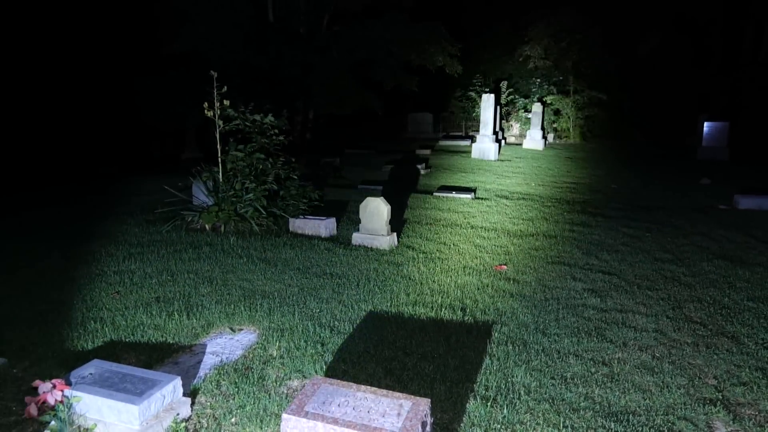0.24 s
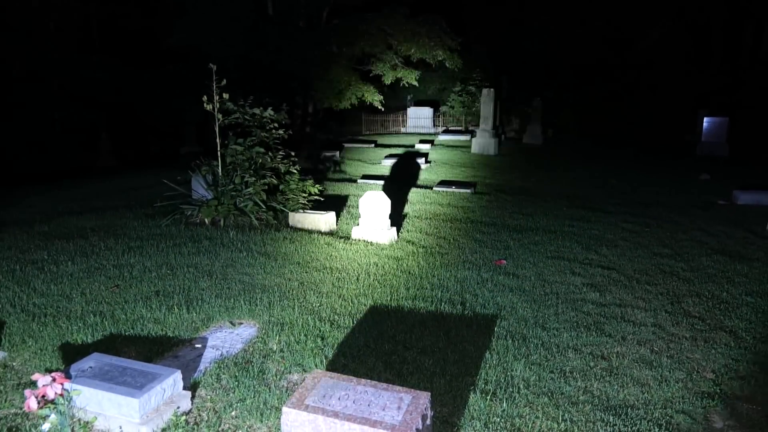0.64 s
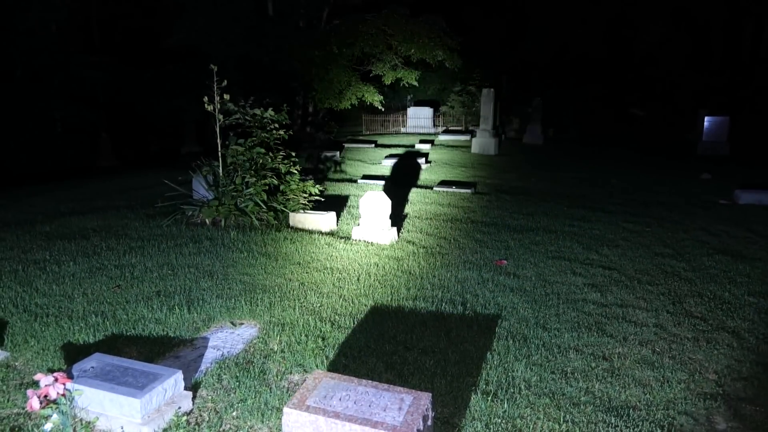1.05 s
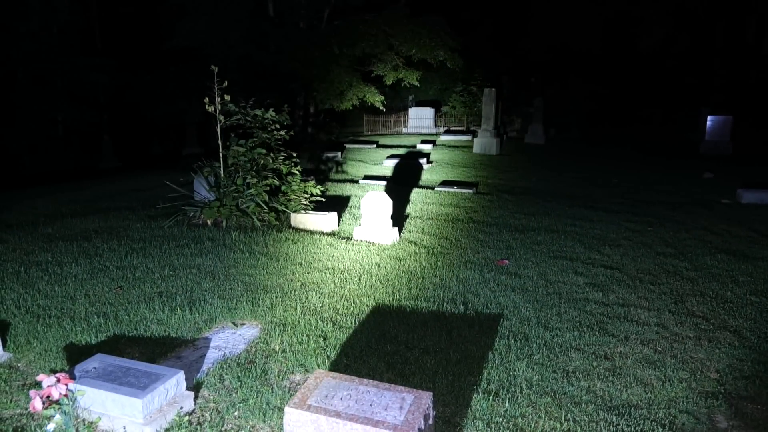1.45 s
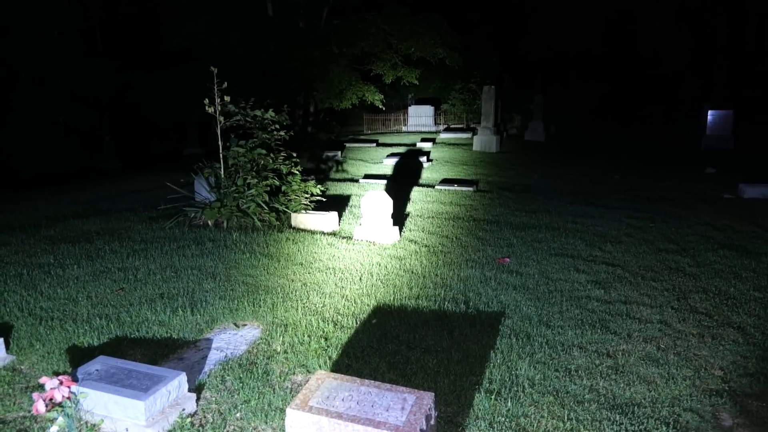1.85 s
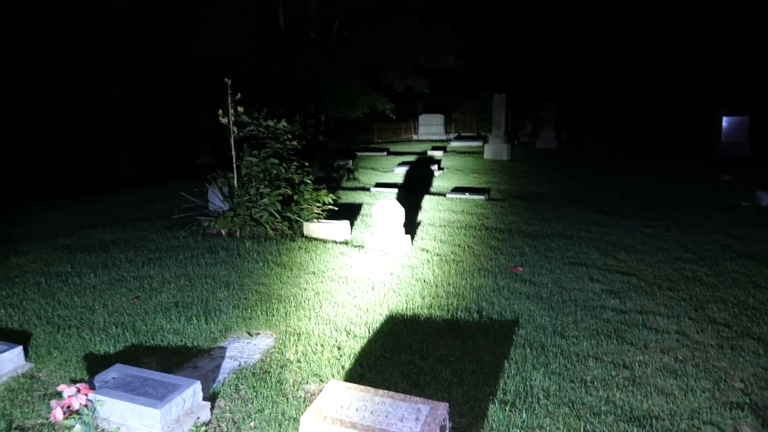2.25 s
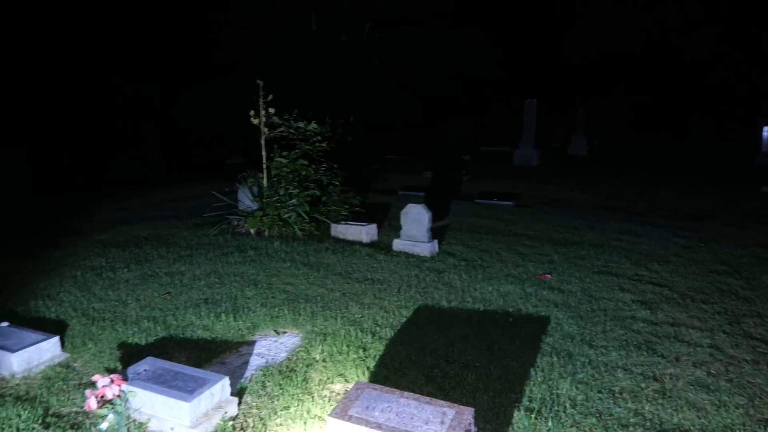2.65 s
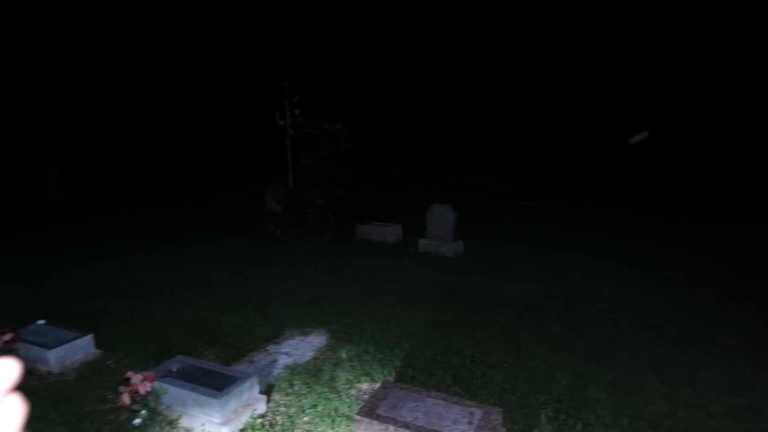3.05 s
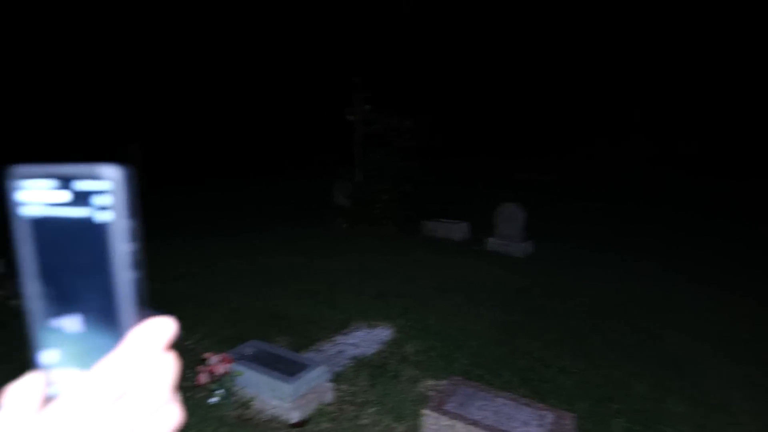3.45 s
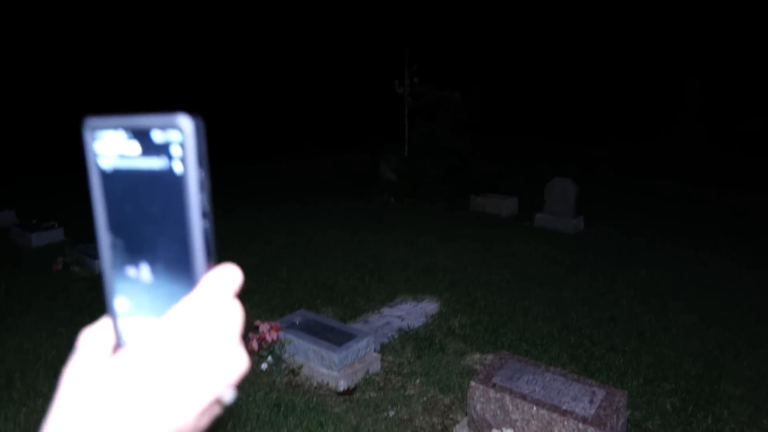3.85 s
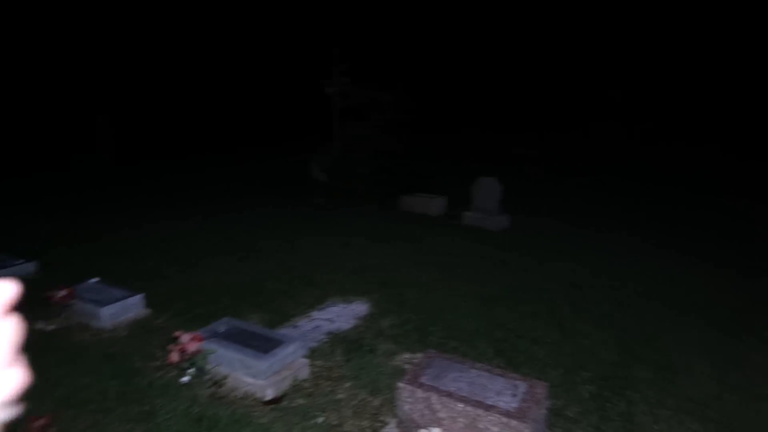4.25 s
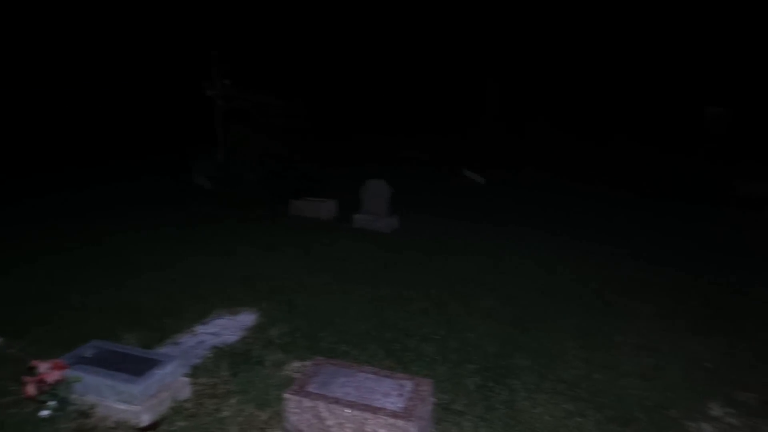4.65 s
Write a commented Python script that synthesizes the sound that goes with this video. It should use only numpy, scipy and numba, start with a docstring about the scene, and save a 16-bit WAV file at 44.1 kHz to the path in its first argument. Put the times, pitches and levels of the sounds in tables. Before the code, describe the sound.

A continuous shimmering cricket chorus fills a wide stereo field, with low warm trills loudest and thinner high ones throbbing above. Grainy katydid rasps come and go far off. A sharp, high pulsed buzz from a nearer katydid rings into the trees, faint hoots follow, then a tiny dry tick and a second buzz cut off at the end. Distant road drone lies underneath.

```python
"""Crowds of crickets trill near and far at night on an open lawn ringed by trees, each crowd on its own note.
Every singer is a row of decaying wing strokes; far katydids are grainy noise that rasps in waves.
A near katydid buzzes twice in bursts of wing-filtered noise, and the trees answer with a noise tail.
Filtered noise makes the distant traffic, the soft hiss of the air and a few faint hoots; a dry tick sounds once."""
import sys
import numpy as np
from scipy import signal
from scipy.fft import rfft, irfft
from scipy.io import wavfile
from scipy.ndimage import uniform_filter1d
from numba import njit

SR = 44100
rng = np.random.default_rng(int(sys.argv[2]) if len(sys.argv) > 2 else 0)


def voltage_ratio(level):
    """Linear amplitude factor for a level in decibels (scalar or array-like)."""
    return 10 ** (np.asarray(level, float) / 20)


def wrap_up_sound(samples):
    """Save the sound to the file named by the first command line argument, as 16-bit audio."""
    columns = np.atleast_2d(samples).T
    # keep every value between -1 and 1, then stretch to whole-number steps
    tamed = np.clip(columns, -1, 1)
    steps = np.round(tamed * 32767).astype(np.int16)
    wavfile.write(sys.argv[1], SR, steps)


N = 211981
T = np.arange(N) / SR  # s
HZ = np.maximum(np.arange(N // 2 + 1) * SR / N, 1)  # spectrum bins

# stereo width of the open air, opposed part against shared part: hz, side_db
AIR_SIDE = [(30, -9), (100, -23), (250, -16), (500, -15.5), (1200, -7), (6000, -1), (8500, -14),
            (11000, -0.5), (15000, 0.5)]


def level(x, db):
    """Scales to an rms level."""
    return x * voltage_ratio(db) / np.sqrt(np.mean(x ** 2))


def colour(x, table):
    """Filters by (Hz, dB) points, all but silent outside them."""
    hz, db = np.transpose(table)
    gain_db = np.interp(np.log(HZ), np.log(hz), db, -90, -90)
    return irfft(rfft(x) * voltage_ratio(gain_db), N)


def pair(side_db):
    """Stereo noise from a shared and an opposed part."""
    mid, side = rng.standard_normal((2, N))
    side = colour(side, side_db)
    return np.array([mid + side, mid - side])


def walk(rate):
    """Random levels held 1 / rate s, then smoothed twice over that time."""
    hold = int(SR / rate)
    steps = np.repeat(rng.standard_normal(N // hold + 1), hold)
    return 0.62 * uniform_filter1d(uniform_filter1d(steps, hold), hold)[:N]


def curves(table):
    """Gain over time for each dB column of a table."""
    s, *columns = np.transpose(table)
    return [voltage_ratio(np.interp(T, s, db)) for db in columns]


@njit
def strokes(start, hz, ring, left, right, n, sr):
    """Each stroke swells and dies as t exp(-t / ring) on its note; start and ring are in samples."""
    out = np.zeros((2, n))
    for j in range(len(start)):
        turn = np.exp(2j * np.pi * hz[j] / sr - 1 / ring[j])
        z = 1 + 0j
        for i in range(int(8 * ring[j])):
            z *= turn
            k = start[j] + i
            if 0 <= k < n:
                out[0, k] += (i / ring[j] * z * left[j]).imag
                out[1, k] += (i / ring[j] * z * right[j]).imag
    return out


def trill(hz, rate, ring_ms, lead, pan_db, uneven_db=0.5, wobble=0.0044, sway_db=3.0):
    """Singers in rows: every one keeps its own note, pace and place; strokes vary a little."""
    # per stroke: timing, level, phase, note
    chance = rng.standard_normal((len(hz), int(6 * rate.max()), 4))
    gaps = (1 + .06 * chance[..., 0]) / rate[:, None]
    s = np.cumsum(gaps, axis=1) - .3 - rng.random((len(hz), 1)) / rate[:, None]
    # each singer swells and sinks at its own slow pace
    pace, start = rng.random((len(hz), 2, 1)).transpose(1, 0, 2)
    sway = sway_db * np.sin(2 * np.pi * ((0.605 + 2.562 * pace) * s + start))
    size = voltage_ratio(sway + uneven_db * chance[..., 1]) * np.exp(2j * np.pi * chance[..., 2])
    # left and right differ in level and phase
    side = (voltage_ratio(pan_db / 2) * np.exp(.5j * lead))[:, None]
    left, right = (size * side).ravel(), (size / side).ravel()
    note = hz[:, None] * (1 + wobble * chance[..., 3])
    ring = np.full(s.size, ring_ms * SR / 1000)
    return strokes((s * SR).astype(np.int64).ravel(), note.ravel(), ring, left, right, N, 1. * SR)


def rasp_gain():
    """Swells of the far rasps add in power over a steady bed."""
    # far rasps, the loud caller in pairs and softer ones between: peak_s, level_db, length_ms
    rasps = [(.04, -38, 170), (.25, -37.5, 160), (.85, -44.5, 460), (1.53, -37.5, 160), (1.74, -39.5, 210),
             (2.05, -46, 470), (2.4, -44.5, 350), (2.89, -40.5, 200), (3.03, -41.5, 140), (3.36, -51, 200),
             (3.87, -39, 200), (4.08, -39, 160), (4.3, -48, 290), (4.68, -47, 560)]
    bed_db = -46.5
    power = voltage_ratio(2 * bed_db)
    for s, db, ms in rasps:
        power = power + voltage_ratio(2 * db) * np.exp(-((T - s) / (ms / 2500)) ** 2)
    return np.sqrt(power)


def crowd_gains():
    """Slow level of each group of trills; the high group throbs at a steady pace."""
    # low and middle groups, below 3.3 kHz: time_s, low_db, middle_db
    low_trills = [(0, -27, -32), (.45, -28, -33.5), (.75, -29.5, -32.5), (1.9, -28.5, -33),
                  (2.6, -28, -33.5), (3.15, -28.5, -33), (3.7, -28.5, -32.5), (4.81, -28.5, -32)]
    # three upper groups that swell apart, one table each: time_s, level_db
    upper_trills = [
        [(0, -42.5), (.5, -46), (.7, -41.5), (.88, -42), (1.17, -47.5), (1.4, -45), (1.85, -47), (2.05, -44),
         (2.45, -43.5), (2.8, -45.5), (3.02, -42.5), (3.2, -49), (3.45, -47), (3.75, -44), (3.9, -54),
         (4.05, -40), (4.25, -46.5), (4.81, -45)],
        [(0, -47), (.7, -46), (1.1, -47), (1.4, -40), (1.6, -42), (1.75, -47), (1.9, -42), (2.2, -52),
         (2.45, -44), (2.75, -47), (3.0, -43), (3.3, -46), (3.55, -46), (3.76, -37.5), (4.1, -44), (4.25, -49),
         (4.81, -48)],
        [(0, -43), (.2, -47), (.8, -43.5), (1.0, -48), (1.3, -43), (1.62, -43), (1.75, -45), (1.92, -39),
         (2.15, -49), (2.35, -45), (2.65, -50), (2.95, -43), (3.12, -48), (3.45, -40), (3.65, -46), (3.85, -43),
         (4.25, -48), (4.81, -46)],
    ]
    # high group: time_s, mean_db, throb_swing_db
    high_trill = [(0, -40.5, -0.5), (1.2, -40, .5), (1.7, -39.5, 1), (2.6, -40, 1), (3.2, -39.5, 2.5),
                  (4.0, -40.5, 1), (4.4, -39.5, 2.6), (4.81, -39.5, 2)]
    # top group: time_s, level_db
    top_trill = [(0, -66), (1.2, -64), (1.8, -54), (2.45, -51), (2.95, -49), (3.2, -57), (4.55, -62),
                 (4.75, -47), (4.81, -50)]
    throb_period_s, throb_peak_s = 0.366, 2.946
    s, mean_db, swing_db = np.transpose(high_trill)
    beat = np.cos(2 * np.pi * (T - throb_peak_s) / throb_period_s)
    throb = voltage_ratio(np.interp(T, s, mean_db) + np.interp(T, s, swing_db) * beat)
    upper = sum(map(curves, upper_trills), [])
    soft_band = voltage_ratio(-14) * rasp_gain()  # a soft band near 5.15 kHz shares the far rasps' level curve
    return curves(low_trills) + upper + [throb, soft_band] + curves(top_trill)


def crickets(count=14):
    """Wing strokes of crowds spread around each wing note, and three singers that stand out alone."""
    # crowds: group (0 low, 1 middle, 2-4 upper, 5 high, 6 soft band near 5.15 kHz, 7 top), note_hz, spread_hz,
    # strokes_per_s, ring_ms, level_db (on top of the group's), phase_scatter_rad, left_minus_right_db
    crowds = [(0, 2205, 55, 52, 3.4, -1.5, 1.2, 0), (0, 2230, 140, 52, 2.0, -7, 1.2, 0),
              (0, 1830, 90, 52, 2.0, -24, 1.4, 0), (1, 2610, 70, 66, 2.6, -6, 1.05, -.6),
              (1, 2790, 70, 66, 2.6, -5, 1.05, -.6), (1, 2960, 75, 70, 2.6, -2, 1.05, -.6),
              (1, 3170, 50, 70, 2.6, -15, 1.05, -.6), (2, 4330, 75, 46, 2.2, 0, .7, -2.3),
              (3, 4540, 65, 46, 2.6, -2, .7, -2.3), (4, 4810, 70, 60, 2.6, -.5, .7, -2.3),
              (6, 5150, 90, 60, 1.8, -3, .7, -2.3), (5, 5430, 80, 60, 1.8, -9, .7, -2.3),
              (5, 5850, 110, 64, 1.6, -1, .7, -2.3), (5, 6060, 40, 64, 2.4, -7, .7, -2.3),
              (5, 6340, 45, 64, 2.6, -14.5, .7, -2.3), (7, 6750, 220, 64, 1.2, 0, .7, -1)]
    # wing note of each lone singer: note_hz
    solo_hz = 7020, 2862, 3393
    # lone singers: strokes_per_s, ring_ms, level_db, left_minus_right_db
    solos = [(21.8, 6.8, -57, -2), (14, 42, -45, 25), (13.96, 28, -54, -18)]
    gains = crowd_gains()
    rank = np.arctanh(np.linspace(-.9, .9, count))  # dense in the middle, sparse at the edges
    out = 0
    for group, hz, spread, rate, ring_ms, db, scatter, pan_db in crowds:
        rates = rate * (1 + .07 * rng.standard_normal(count))
        lead = scatter * rng.permutation(rank)
        pan = 2.0 * rng.permutation(rank) + pan_db
        crowd = trill(hz + spread * rank, rates, ring_ms, lead, pan)
        out = out + level(crowd, db) * gains[round(group)]
    for hz, (rate, ring_ms, db, pan_db) in zip(solo_hz, solos):
        note, pace = np.array([[hz], [rate]], float)
        solo = trill(note, pace, ring_ms, np.zeros(1), np.full(1, pan_db), wobble=0.00063)
        out = out + level(solo, db)
    return out


def far_katydids():
    """Many scraping wings blur into a grainy noise rasp that comes in waves."""
    # rasp spectrum: hz, level_db
    rasp_tone = [(3000, 4), (3500, -2), (4500, 2.5), (5500, 2), (6800, -13.5), (7600, -17), (9000, -20.5),
                 (12000, -13), (15000, -21)]
    grain = voltage_ratio(1.9 * walk(150))
    scrape = grain * pair([(2000, -0.5), (7000, -10.0), (16000, -4)])
    return level(colour(scrape, rasp_tone), 0) * rasp_gain()


def traffic():
    """Far tyres and engines: noise split into rumble, drone and tyre hiss, with blurred engine notes."""
    # road noise spectrum before the split: hz, relative_db
    road_tone = [(15, -57), (25, -24), (43, -25), (102, -1.5), (119, 2), (162, 0), (182, -6), (209, -3.5),
                 (244, -8.5), (310, -4), (476, -15), (659, -19), (743, -16), (1010, -22), (1500, -19.5),
                 (1950, -81), (3300, -120)]
    # rough levels of the three parts, uneven as noise is: time_s, rumble_db, drone_db, tyre_hiss_db
    road_level = [(0, -47.5, -49.5, -54.5), (.25, -47, -48, -53), (.7, -47.5, -53.5, -57.5),
                  (1.2, -46.5, -57, -57), (2.1, -47, -51.5, -56.5), (2.8, -45.5, -56, -57),
                  (3.08, -46, -49, -54), (3.7, -43.5, -51, -56.5), (3.9, -48.5, -54.5, -57),
                  (4.12, -42, -55.5, -57), (4.35, -48.5, -52.5, -56), (4.6, -44, -49, -56),
                  (4.81, -44, -53, -53)]
    # wavering engine notes: pitch_hz, width_hz, level_db
    hum = [(115, 15, -57), (161.3, 18, -59), (210.7, 8.8, -60)]
    road = colour(pair(AIR_SIDE), road_tone)
    rumble = colour(road, [(10, 5.0), (200, 0.0), (260, -27)])
    drone = colour(road - rumble, [(150, -2.0), (480, 0.5), (620, -21)])
    tyres = road - rumble - drone
    out = 0
    for part, gain in zip((rumble, drone, tyres), curves(road_level)):
        out = out + level(part, 0) * gain
    for hz, width, db in hum:
        resonance = 1 / (1 + ((HZ - hz) / width * 2) ** 2)
        note = irfft(rfft(rng.standard_normal(N)) * resonance, N)
        out = out + level(note, db)
    return out


def air_hiss():
    """Steady wide noise, the soft hiss of the air."""
    # hiss spectrum: hz, relative_db
    hiss_tone = [(900, -11), (1600, 4), (3500, 4), (7000, 7.5), (7500, -5), (9000, -1.5), (12000, -6.5),
                 (15000, -1.5), (16000, -3)]
    return level(colour(pair(AIR_SIDE), hiss_tone), -45)


def tree_echo(dry):
    """Leaves scatter the buzz into a dense tail, made by convolving it with decaying noise."""
    t60_s, rise_s, echo_db, side_db = 0.67, 0.0053, 0.5, -9
    t = T[:SR]
    scatter = pair([(5000, side_db), (17000, side_db)])[:, :SR]
    leaves = scatter * voltage_ratio(-60 * t / t60_s) * np.minimum(t / rise_s, 1)
    leaves = level(leaves, 0) / np.sqrt(SR)  # unit energy per channel on average
    tail = signal.fftconvolve(dry, leaves, axes=1)[:, :N]
    # the tail keeps 5-16 kHz only
    tail = colour(tail, [(5000, -2.4), (9000, -1.5), (16000, -1)])
    return voltage_ratio(echo_db) * tail


def near_katydid():
    """Noise for dense tooth strikes rings through the wing's spectrum in short strokes; the trees echo it."""
    # wing spectrum: hz, level_db
    wing_tone = [(6500, -10), (7500, -1), (8000, 0.5), (8600, -0.5), (9070, -6), (9800, -3.5), (10300, -6),
                 (11900, -9), (13500, -15.5), (14700, -21), (15500, -26)]
    # strokes: peak_s, level_db (before the tone changes), length_ms, brightness_db_per_octave, lowest_note_hz
    buzz = [(2.573, -38, 44, -4, 7300), (2.65, -37, 99, 0, 7400), (2.733, -30.5, 42, 2, 7200),
            (2.815, -30.5, 50, 1, 7350), (2.898, -30, 51, 5, 7250), (2.982, -31.5, 51, -0.5, 7050),
            (4.647, -31.5, 40, -3, 7950), (4.731, -29.5, 40, 2, 7850), (4.81, -31.5, 52, -3, 7240)]
    side_db, pan_db = -8, 1  # pan is left minus right
    teeth = voltage_ratio(1.9 * walk(500)) * pair([(5000, side_db), (17000, side_db)])
    plain = level(colour(teeth, wing_tone), 0)
    # weighting by octaves from 11.2 kHz; adding some of it tilts the tone
    tilt = irfft(rfft(plain) * np.log2(HZ / 11200.0), N)
    dry = 0
    for s, db, ms, tilt_db, low_hz in buzz:
        tilted = plain + tilt_db * np.log(10) / 20 * tilt
        wing = colour(tilted, [(0.89 * low_hz, -26), (low_hz, 0), (SR / 2, 0)])
        swell = np.exp(-.5 * ((T - s) / (ms / 2500)) ** 2)
        dry = dry + voltage_ratio(db) * swell * wing
    pan = voltage_ratio(np.array([[pan_db], [-pan_db]]) / 2)
    return (dry + tree_echo(dry)) * pan


def hoots():
    """Faint hollow hoots far off: narrow bands of noise that swell and fade."""
    # hoots: peak_s, level_db, pitch_hz, swell_ms (bell curve's standard deviation)
    calls = [(3.03, -59, 855, 35), (3.055, -61, 550, 25), (3.26, -64, 870, 30)]
    out = 0
    for s, db, hz, ms in calls:
        resonance = 1 / (1 + ((HZ - hz) / 45.) ** 2)
        breath = irfft(rfft(rng.standard_normal(N)) * resonance, N)
        out = out + level(breath, db) * np.exp(-.5 * ((T - s) / (ms / 1000)) ** 2)
    return out


def tick():
    """A small dry click close by: one quickly dying stroke, the same left and right."""
    # clicks: start_s, peak_db, pitch_hz, length_ms (four ring times)
    clicks = [(4.243, -34, 1200, 1.2)]
    s, db, hz, ms = np.transpose(clicks)
    size = voltage_ratio(db) * np.e + 0j  # t exp(-t) peaks at 1 / e
    return strokes((s * SR).astype(np.int64), hz, ms * SR / 4000, size, size, N, 1. * SR)


def scene():
    """All sources over the soft hiss of the air."""
    steady = crickets() + far_katydids() + traffic() + air_hiss()
    return steady + near_katydid() + hoots() + tick()


def band_limit(x):
    """A steep low-pass at the top of the band."""
    return signal.sosfilt(signal.butter(12, 16310, fs=SR, output="sos"), x)


def record(dry):
    """A steep low-pass takes the top off above 15.13 kHz."""
    low_pass = signal.ellip(12, .2, 60, 15130, fs=SR, output="sos")
    mix = signal.sosfilt(low_pass, dry)
    return band_limit(mix)


dry = scene()
out = record(dry)
wrap_up_sound(out)
```